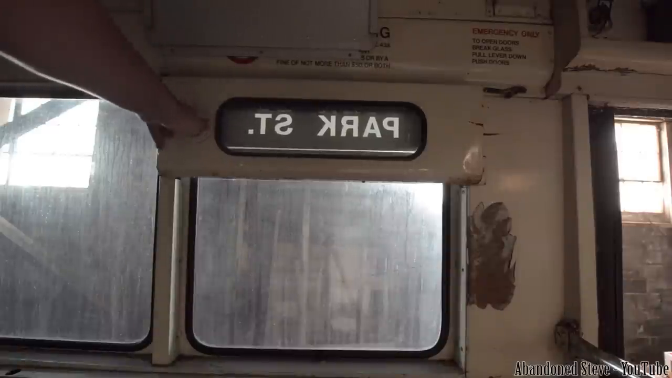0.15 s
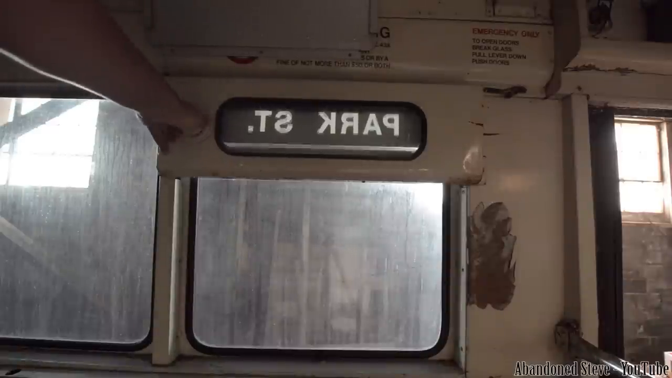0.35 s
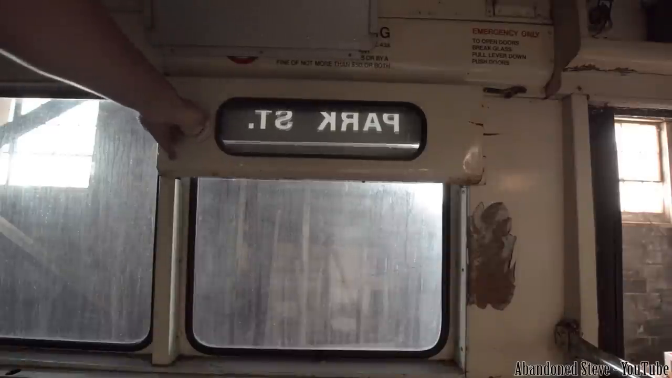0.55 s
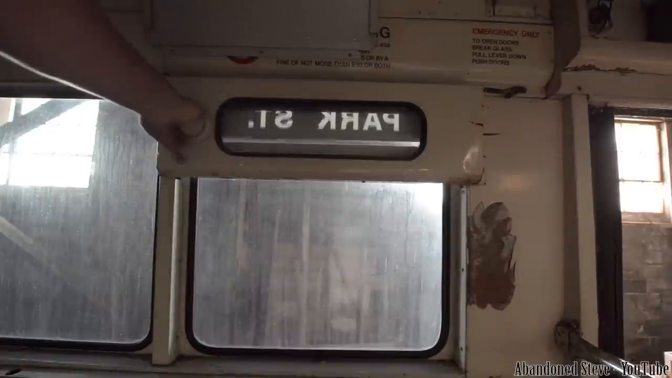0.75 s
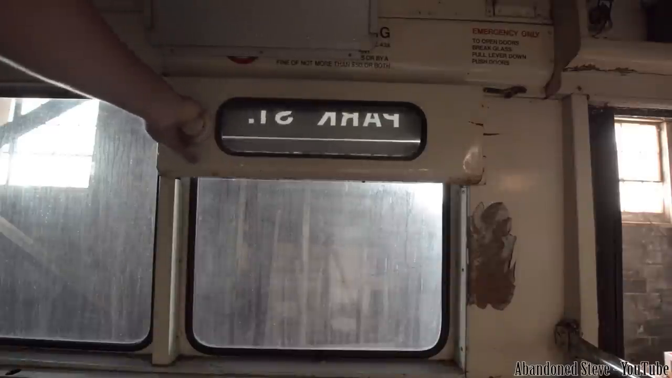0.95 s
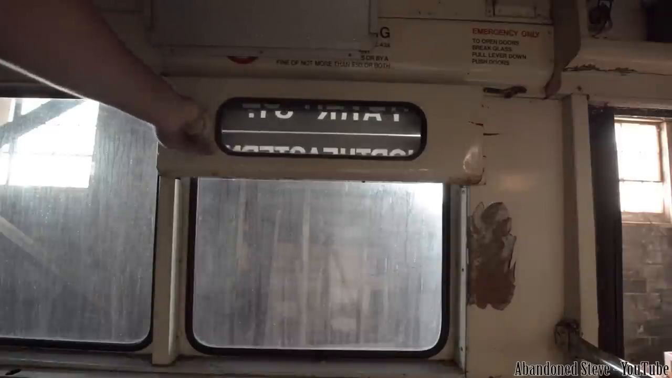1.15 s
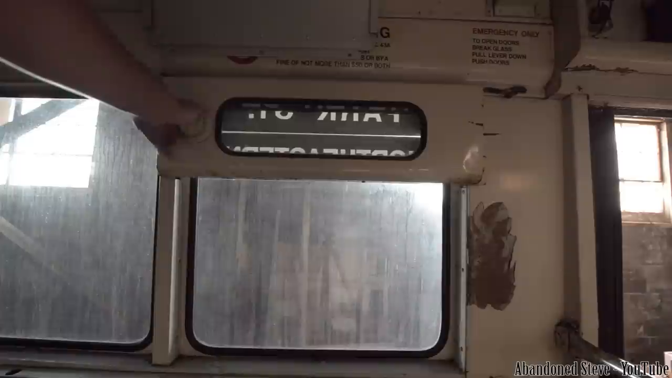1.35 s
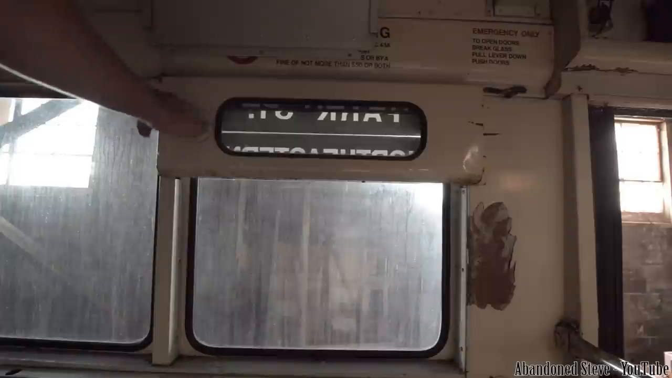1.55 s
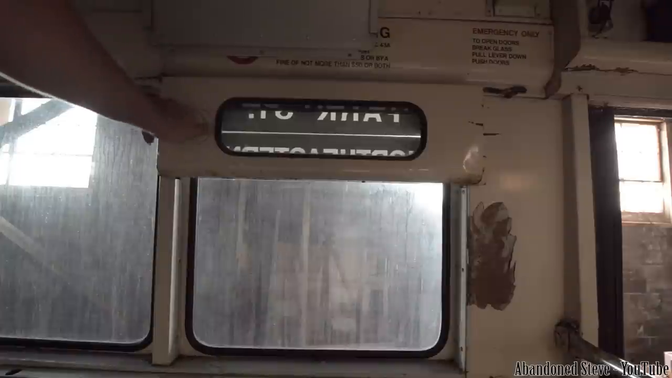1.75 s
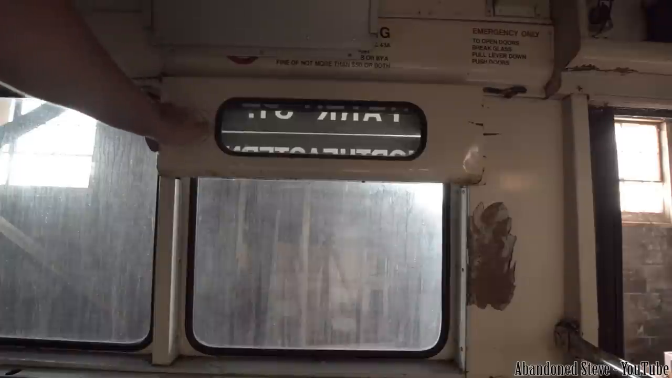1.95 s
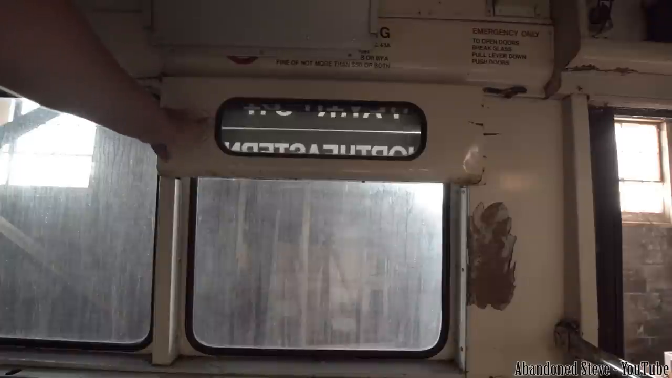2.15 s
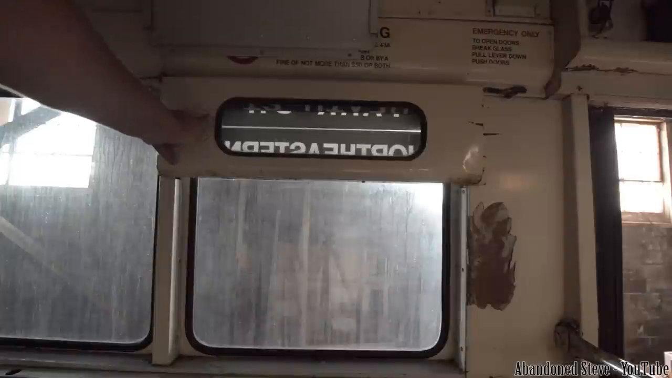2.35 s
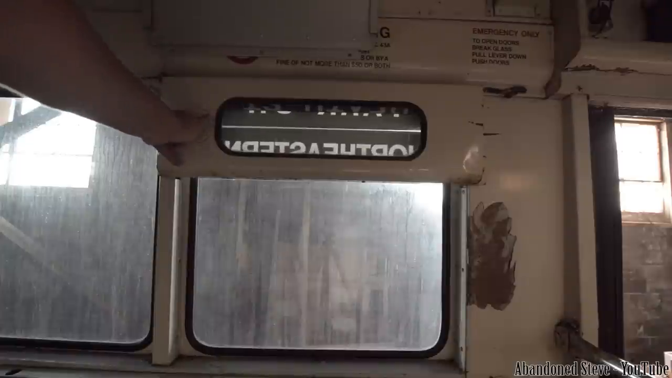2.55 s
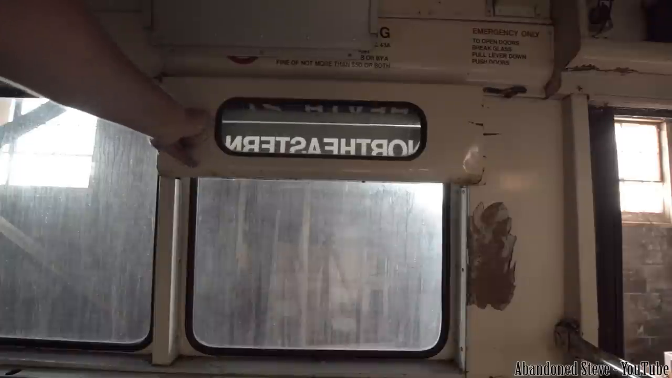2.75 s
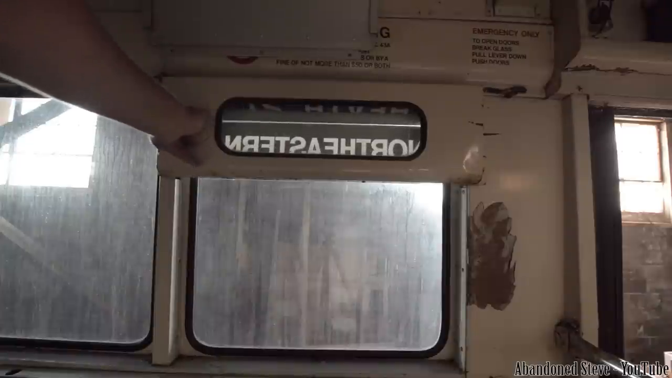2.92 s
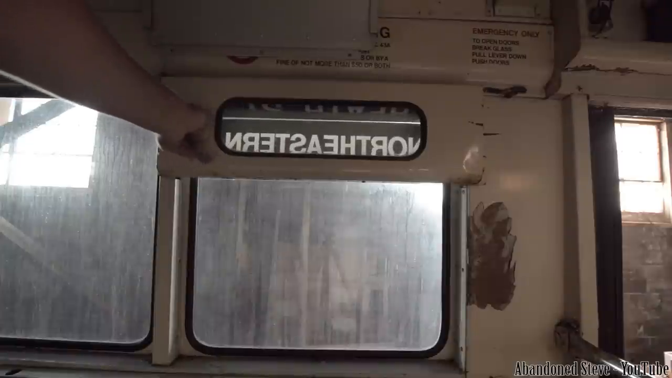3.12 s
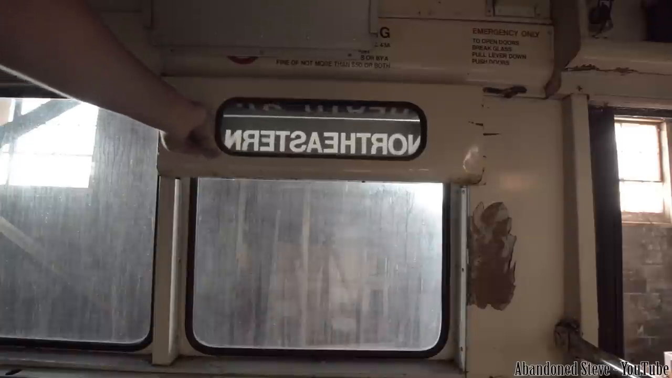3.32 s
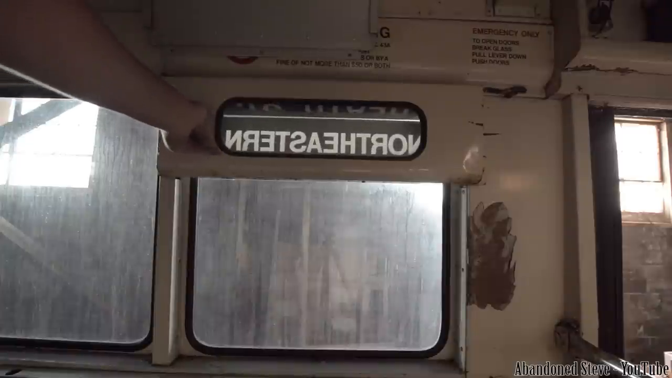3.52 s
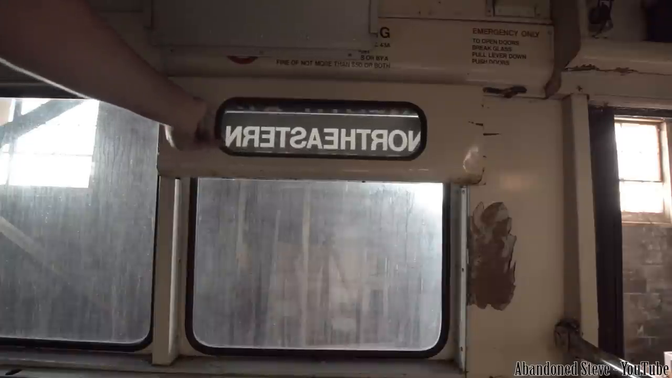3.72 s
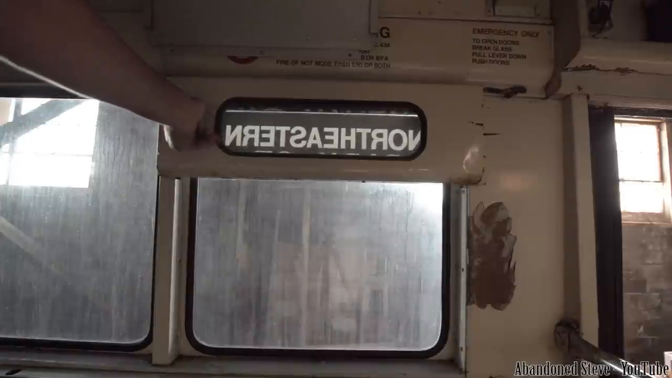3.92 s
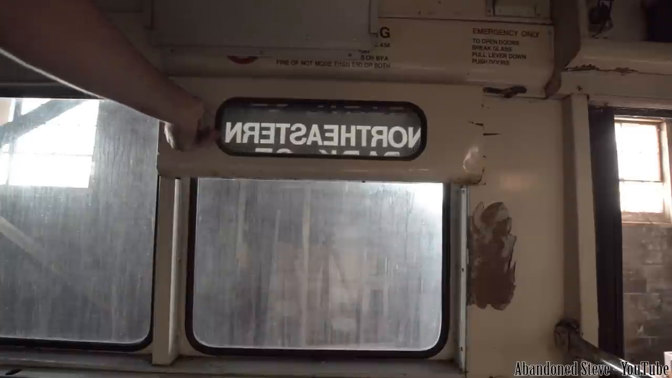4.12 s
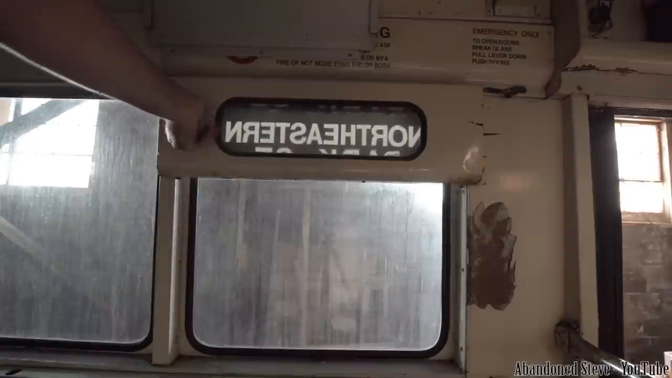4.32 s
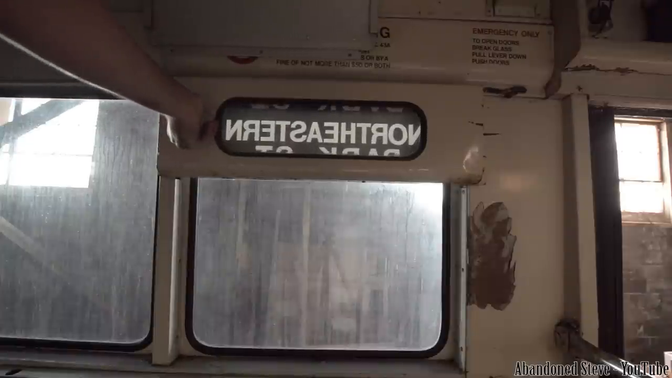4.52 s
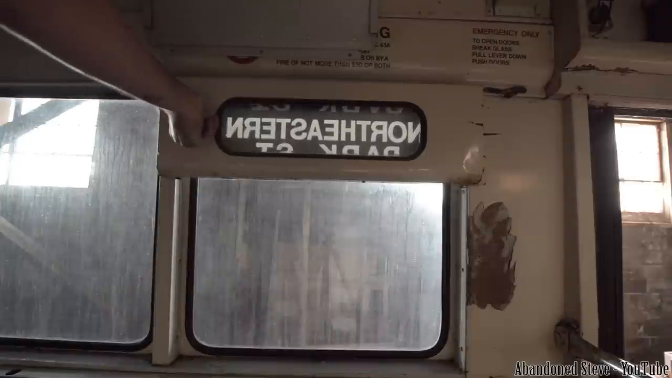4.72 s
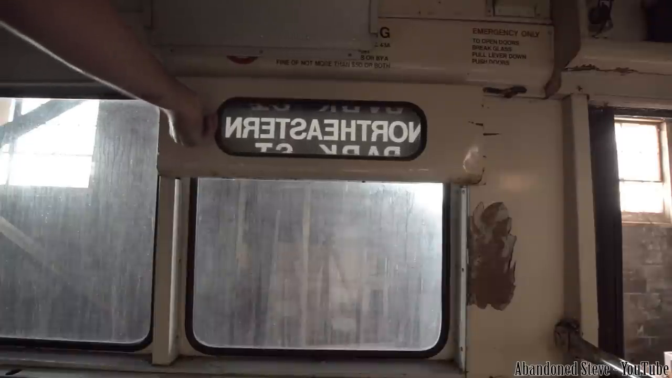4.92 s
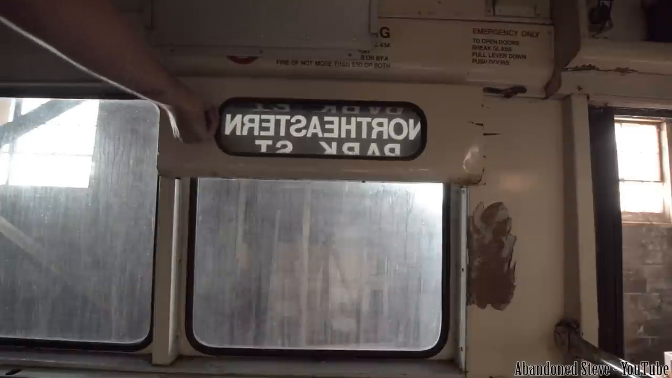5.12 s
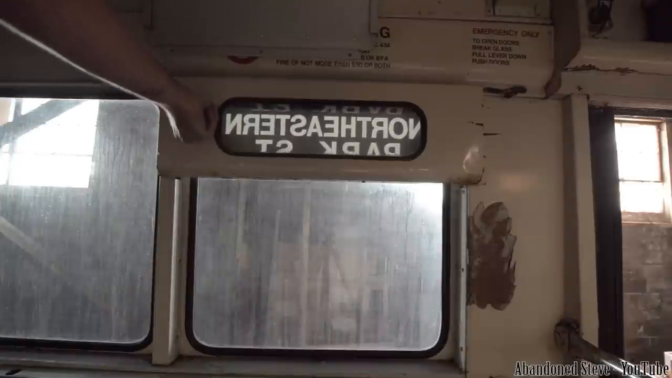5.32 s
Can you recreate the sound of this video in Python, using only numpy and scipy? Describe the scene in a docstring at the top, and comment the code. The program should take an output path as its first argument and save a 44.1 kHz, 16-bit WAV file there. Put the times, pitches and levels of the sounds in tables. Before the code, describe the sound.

A hand turns an old streetcar's roller sign: hard ratcheting metal snaps with quick rebounds, dull knocks, and a short pause before resuming.

```python
"""Light ticks, sharp metallic slams and dull knocks ring through an empty old tram car.
A hand cranks the roller blind of a destination sign: ticks as a spring catch is freed, then slams and rebounds.
The catch is bursts of grainy noise with panel rattle and a cabin tail; the sheet-metal box is ringing modes.
The loose roller and crank knock; in the pause the hand shifts, as rumble and rub, over a faint noise floor."""
import sys
import numpy as np
from scipy import signal
from scipy.fft import rfft, irfft
from scipy.io import wavfile

SR = 44100
rng = np.random.default_rng(int(sys.argv[2]) if len(sys.argv) > 2 else 0)


def materialize(psi):
    """Save the field psi as 16-bit PCM at rate SR to the path in sys.argv[1].

    A 1-D psi becomes a single channel; in a 2-D psi each row is a channel.
    """
    bounded = np.clip(np.atleast_2d(psi).T, -1, 1)
    quanta = np.round(bounded * 32767).astype(np.int16)
    wavfile.write(sys.argv[1], SR, quanta)


N = 236684  # samples
LEAD = SR // 3  # run-in samples, so that an earlier slam is already ringing at the start


def from_db(db):
    """Decibels to amplitude gain."""
    return 10 ** (np.asarray(db) / 20)


def at_hz(points, hz, column=1):
    """Reads a table column by interpolating along a log-frequency axis."""
    points = np.array(points, float)
    log_hz = np.log(np.maximum(points[:, 0], 1))
    return np.interp(np.log(hz), log_hz, points[:, column])


def colour(x, spectrum):
    """Colours each channel causally: the spectrum becomes a minimum-phase filter."""
    size = 8192
    hz = np.maximum(np.arange(size // 2 + 1) * SR / size, 10)
    cepstrum = irfft(np.log(from_db(at_hz(spectrum, hz))))
    # Folding the cepstrum onto positive times gives minimum phase
    cepstrum[1:size // 2] *= 2
    cepstrum[size // 2 + 1:] = 0
    impulse = irfft(np.exp(rfft(cepstrum)))
    return signal.fftconvolve(x, np.atleast_2d(impulse), axes=1)[:, :x.shape[1]]


def noise(spectrum, alike):
    """Coloured stereo noise of rms 1; alike is the correlation of left and right."""
    mid, side = rng.standard_normal((2, N))
    stereo = np.sqrt(1 + alike) * mid + np.sqrt(1 - alike) * side * [[1], [-1]]
    out = colour(stereo, spectrum)
    return out / np.sqrt(np.mean(out ** 2))


def resonator(hz, radius):
    """Feedback coefficients of a two-pole resonance; the pole radius sets its damping."""
    return [1, -2 * radius * np.cos(2 * np.pi * hz / SR), radius ** 2]


def floor_noise(level_db):
    """Steady, nearly mono noise lies faintly under everything."""
    # Floor colour: f/Hz, relative density/dB per Hz
    floor_spectrum = [(15, -50), (25, -2), (105, 13), (256, 1), (531, -15), (591, -14), (695, -8.5),
                      (1160, -16.5), (12900, -32), (16000, -75.5)]
    return from_db(level_db) * noise(floor_spectrum, alike=0.98)


def hand():
    """The grip shifts: a dull rumble through the box and a thin rub of skin on metal."""
    # Hand on the crank: t/s, rumble level/dB, rub level/dB
    grip = [(1.45, -53.5, -73), (1.604, -69, -74.5), (1.7, -53, -62), (1.787, -74, -82), (1.81, -41, -60),
            (1.84, -48.5, -77), (1.978, -62.5, -71), (2.029, -47, -67)]
    # Colours of rub and rumble: f/Hz, relative density/dB per Hz
    rub_spectrum = [(700, -7.5), (2000, 8.5), (7000, -1), (9500, -2), (10700, 7), (12000, -2)]
    rumble_spectrum = [(40, -17), (90, 1.5), (300, 0), (600, 1.5), (1200, -49)]
    s, rumble_db, rub_db = np.transpose(grip)
    t = np.arange(N) / SR

    def level(db):
        """Gain curve, practically silent outside the grip."""
        return from_db(np.interp(t, s, db, left=-120, right=-120))

    rumble = level(rumble_db) * noise(rumble_spectrum, alike=0.75)
    rub = level(rub_db) * noise(rub_spectrum, alike=0.41)
    return rumble + rub


def contacts():
    """All blows as rows of (s, treble dB, clank dB, thud dB, boom dB, chatter decay ms), levels relative."""
    # Dull knocks of the loose roller and crank: t/s, clank level/dB, thud level/dB
    knock_table = [(0.337, -52, -48), (0.43, -26, -24.5), (.617, -44, -27.5), (0.958, -40, -29),
                   (1.393, -48, -42), (1.529, -56, -46), (1.709, -52, -45), (1.751, -58, -47),
                   (1.799, -38.5, -36.5), (1.806, -33.5, -34.5), (1.957, -46, -60), (2.27, -31, -22.5),
                   (2.651, -53.5, -47.5), (3.098, -49, -27), (3.515, -49, -43), (3.633, -21, -18.5),
                   (3.798, -35, -20), (3.835, -35.5, -30), (3.941, -35, -34.5), (4.056, -31, -21),
                   (4.313, -46, -41), (4.44, -38, -22.5), (4.973, -45, -32), (5.068, -35, -25),
                   (5.253, -37.5, -44)]
    # Light ticks as the catch is freed: t/s, clank level/dB, treble over clank/dB
    tick_table = [(0.354, -30, -4), (0.552, -24, -1), (0.764, -23.5, -4.5), (2.032, -27.5, -6),
                  (2.18, -31, -10), (2.664, -40.5, -11), (2.672, -28.5, 1), (2.777, -39, 3),
                  (3.008, -25.5, -18), (3.255, -30.5, -7), (3.263, -24.5, -6), (3.267, -24.5, -8),
                  (3.574, -31, -2.5), (3.584, -22, -4.5), (3.753, -35, 2), (3.988, -25.5, -7.5),
                  (4.343, -29, -18), (4.35, -35, -4.5), (4.64, -21.5, -15), (4.646, -21, -17),
                  (4.986, -25.5, -9), (5.36, -36, -16)]
    # The catch slams home and rebounds: t/s, clank level/dB, treble over clank/dB, thud over clank/dB,
    # rebound delay/ms, rebound over slam/dB, rebound treble over its clank/dB
    slam_table = [(-0.25, -6, -2, 2.5, 5, 2, 2), (0.371, -17.5, 0, 2.5, 5.9, 2.5, 0),
                  (0.565, -19.5, 1.5, 10, 6.64, 0, 2.5), (0.775, -16, -0.5, -2, 5.5, -1.5, 1),
                  (0.797, -12.5, 6.5, 1.5, 5, 3, -17), (1.036, -18, 1.5, 5.5, 4.1, 3, -6.5),
                  (1.053, -16, 2.5, 2.5, 7.74, 1.5, -2.5), (1.286, -28, -4, 7, 4.57, 4.5, -11),
                  (1.341, -22, -15, 3, 4.66, -8.5, -14.5), (2.044, -17.5, 2, 2, 3.1, 1, -0.5),
                  (2.208, -17, -2.5, 6, 11.8, -9.5, -4), (2.683, -13, -5, 3.5, 4.46, -4, -0.5),
                  (2.719, -12, 4, -7, 4.85, 5, -13), (3.022, -20, 2, 1, 4.5, 5.5, -1),
                  (3.28, -15.5, -5, 6, 5.04, -4.5, 1.5), (3.595, -15.5, -4, 2.5, 6, -0.5, 2),
                  (3.756, -26.5, -11, 6, 6.6, 2, -11), (3.776, -24.5, -2, 5, 4.7, -8.5, 0),
                  (4.004, -14, -5, 0.5, 4.3, 0.5, 1.5), (4.363, -14, -6, 3, 4.86, -2.5, 3.5),
                  (4.654, -11.5, -15, 1.5, 5.26, -5, 3.5), (5.002, -15.5, 0.5, 5, 9.1, -11.5, 4)]
    # Slam, rebound, settling: delay/rebound delays, treble/dB, clank/dB, thud/dB, boom under thud/dB,
    # chatter decay/ms
    stages = [(0, -0.5, 0, -3.5, -14.5, 3.05), (1.002, -0.57, -0.74, -0.63, -7.5, 3.35),
              (2.4, -12, -7.5, -7.5, -2.5, 4)]
    knock_dull_db, knock_boom_db, knock_ms = -22, -4, 1.2  # treble re clank, boom re thud, decay
    tick_thud_db, tick_boom_db, tick_ms = 0, -16.5, 3.55  # thud and boom re clank, decay

    blows = []
    for s, clank_db, bright_db, heavy_db, after_ms, rebound_db, rebound_bright_db in slam_table:
        for delays, treble, clank, thud, boom, decay_ms in stages:
            db, top_db = clank_db, bright_db
            if delays > 0:
                db, top_db = clank_db + rebound_db, rebound_bright_db
            start = s + delays * after_ms / 1000
            thud_db = db + heavy_db + thud
            blows.append((start, db + top_db + treble, db + clank, thud_db, thud_db + boom, decay_ms))
    for s, db, bright_db in tick_table:
        blows.append((s, db + bright_db, db, db + tick_thud_db, db + tick_boom_db, tick_ms))
    for s, clank_db, thud_db in knock_table:
        blows.append((s, clank_db + knock_dull_db, clank_db, thud_db, thud_db + knock_boom_db, knock_ms))
    return blows


def strengths(hz):
    """Start samples, relative dB at this pitch and chatter decay in ms of every blow."""
    s, treble_db, clank_db, thud_db, boom_db, decay_ms = np.transpose(contacts())
    anchors_hz = [104, 264, 1199, 5000]  # where boom, thud, clank and treble apply
    place = np.interp(np.log(hz), np.log(anchors_hz), range(4))
    share = np.maximum(1 - abs(place - np.arange(4)), 0)  # crossfade between neighbours
    start = LEAD + np.round(s * SR).astype(int)
    return start, share @ [boom_db, thud_db, clank_db, treble_db], decay_ms


def sign_box(level_db, spread_db, push_cycles):
    """Every blow pushes each sheet-metal mode with its own strength and sign; the ring has a soft onset."""
    # Modes of the sign box: f/Hz, relative level/dB, t60/s
    modes = [(84.1, -9.5, 0.59), (117.3, 3, 0.38), (166.9, 6, 0.2), (211.3, -5, 0.33), (240.8, -5, 0.37),
             (305.8, -2, 0.21), (336.5, 2, 0.17), (441, -11.5, 0.37), (596.6, -10, 0.14), (804, -2, 0.11),
             (932, -7.5, 0.087), (1159, -17, 0.047), (1305, -0.5, .12), (1406, -2, .12),
             (1768, -2.5, 0.068), (1969, -7.5, 0.062), (2135, -1.5, 0.044), (271.6, -4, 0.15),
             (376.3, -8.5, 0.1), (497, -5, 0.074), (140.4, 0, 0.28)]
    out = 0
    chance = rng.standard_normal((len(contacts()), len(modes), 2))
    for k, (hz, mode_db, t60) in enumerate(modes):
        at, db, _ = strengths(hz)
        push = from_db(db + mode_db + spread_db * chance[:, k, 0])
        clicks = np.full(N + LEAD, 1e-18)  # tiny offset keeps the filters fast
        np.add.at(clicks, at, push * np.sign(chance[:, k, 1]))
        radius = from_db(-60 / (t60 * SR))
        ring = signal.lfilter([0, np.sin(2 * np.pi * hz / SR)], resonator(hz, radius), clicks)
        # A broad, quickly damped resonance at the same pitch softens the onset
        swell = np.exp(-hz / (push_cycles * SR))
        out = out + signal.lfilter([1 - swell, 0, swell - 1], resonator(hz, swell), ring)
    return from_db(level_db) * out[LEAD:]


def dying(power, t60):
    """Energy that is fed in dies away exponentially, by 60 dB in t60 seconds."""
    return signal.lfilter([1], [1, -from_db(-120 / (t60 * SR))], power + 1e-18)


def catch(level_db, grain_db, rise_ms, build_ms, uneven_db):
    """In half-octave bands, each blow is a flurry of micro-impacts, then panel rattle and a cabin tail."""
    # Colour of the blows: f/Hz, relative density/dB per Hz
    crack = [(30, -34), (60, -20.5), (90, -2.5), (150, 0.5), (400, 8), (1000, 10.5), (2500, 7.5),
             (5000, 10), (8000, 7.5), (11000, 4), (15000, 3)]
    # Shaken panels: f/Hz, level over the crack/dB, t60/s
    rattle = [(60, -22.5, 0.43), (208.8, -13, 0.21), (700, -11.5, 0.094), (2480, -3, 0.046),
              (7150, -14.5, 0.055), (14660, -22, .08)]
    # Reverberation of the bare cabin: f/Hz, level over the crack/dB, t60/s
    cabin = [(60, -9, 0.87), (206, -4.5, 0.69), (710, -16, 0.57), (2483, -15, 0.54), (6350, -25, 0.49),
             (15000, -28.5, 0.35)]
    # Stereo width: f/Hz, side minus mid/dB
    width = [(60, -11.5), (180, -10), (550, -9), (1650, -10), (4970, -5.5), (15000, -0.5)]
    size = N + LEAD
    t_ms = np.arange(SR // 25) * 1000 / SR
    # Random gains make the noise grainy
    grains = rng.standard_normal((2, size)) * from_db(grain_db * rng.exponential(1, size))
    grains = grains / np.sqrt(np.mean(grains ** 2))
    white = rng.standard_normal((2, 2, size))  # neighbouring bands get unrelated tail noise
    build = 1000 / (build_ms * SR)
    out = 0
    edges = 25 * 2 ** np.arange(0, 9.6, .5)
    for k, (low, high) in enumerate(zip(edges, edges[1:])):
        hz = np.sqrt(low * high)
        at, db, decay_ms = strengths(hz)
        db = db + uneven_db * rng.standard_normal(len(db))  # no two blows have the same colour

        flurry = np.zeros(size + len(t_ms))  # power envelope
        decay = np.exp(-t_ms / decay_ms[:, None])
        shapes = from_db(db)[:, None] * decay * (1 - np.exp(-t_ms / rise_ms))
        np.add.at(flurry, at[:, None] + np.arange(len(t_ms)), shapes ** 2)

        energy = np.zeros(size)
        np.add.at(energy, at, from_db(2 * db) * decay_ms / 4)  # a longer flurry feeds in more
        energy = signal.lfilter([build], [1, build - 1], energy)  # reflections build up
        tail = 0
        for part in (rattle, cabin):
            part_power = from_db(2 * at_hz(part, hz))
            tail = tail + part_power * dying(energy, at_hz(part, hz, column=2))

        sound = np.sqrt(flurry[:size]) * grains + np.sqrt(tail) * white[k % 2]
        band = signal.butter(2, [low, high], "band", fs=SR, output="sos")
        mid, side = signal.sosfilt(band, sound)
        stereo = mid + from_db(at_hz(width, hz)) * side * [[1], [-1]]
        out = out + from_db(at_hz(crack, hz)) * stereo
    return from_db(level_db) * out[:, LEAD:]


def sheen(x):
    """Dense panel resonances colour the ring-off, added in parallel to the plain sound."""
    # Panel resonances: f/Hz, width/Hz, gain of the added resonance/dB
    panels = [(599, 46, -3), (936, 34, -2.5), (1299, 41, -4), (1726, 41, -5), (2057, 72, -2),
              (3000, 57, -12), (4000, 63, 0), (4320, 72, -6.5), (5040, 84, -3), (5440, 28, 5),
              (5720, 96, -6), (7700, 90, -14.5), (1136, 16, -11.5), (1920, 30, -2), (3260, 33, -12.5),
              (4730, 49, -5), (4880, 42, -0.5), (6900, 130, -11.5), (8200, 38, -19)]
    out = x.copy()
    for hz, width_hz, boost_db in panels:
        radius = np.exp(-np.pi * width_hz / SR)
        edge = (1 - radius * radius) / 2
        out += from_db(boost_db) * signal.lfilter([edge, 0, -edge], resonator(hz, radius), x)
    return out


def scene():
    """Catch and box sound over hand noise and floor."""
    blows = sheen(catch(level_db=4, grain_db=4.5, rise_ms=0.73, build_ms=1.2, uneven_db=2.44))
    box = sign_box(level_db=-7.5, spread_db=2.5, push_cycles=0.45)
    return blows + box + hand() + floor_noise(level_db=-50.5)


def record(dry):
    """The left port is the more sensitive; the bass is rolled off, peaks clip softly, the top is cut."""
    # Channel balance: f/Hz, left minus right/dB
    left_bias = [(60, 5), (180, 4.5), (550, 1.5), (1650, 2.5), (4970, 2), (9000, 3), (15000, 0.5)]
    left = colour(dry[:1], [(hz, db / 2) for hz, db in left_bias])
    right = colour(dry[1:], [(hz, -db / 2) for hz, db in left_bias])
    bass_cut = signal.butter(2, 35, "high", fs=SR, output="sos")
    rolled = signal.sosfilt(bass_cut, np.vstack([left, right]))
    clipped = 1.121 * np.tanh(rolled / 1.134)
    top_cut = signal.cheby2(12, 70, 16600, fs=SR, output="sos")  # order, stopband dB, stopband edge Hz
    return signal.sosfilt(top_cut, clipped)


dry = scene()
out = record(dry)
materialize(out)
```